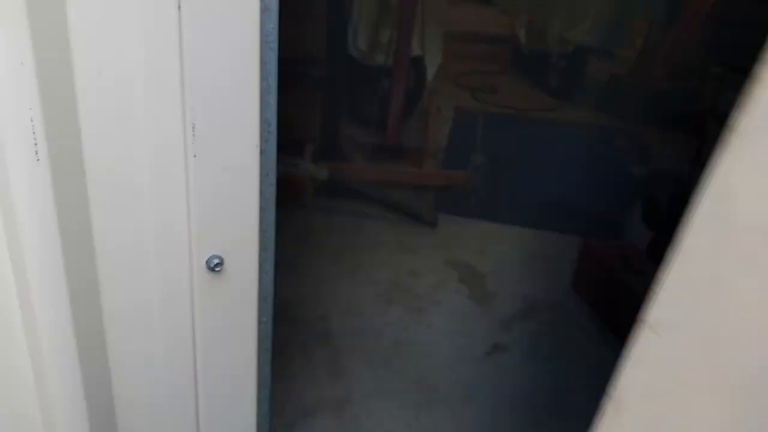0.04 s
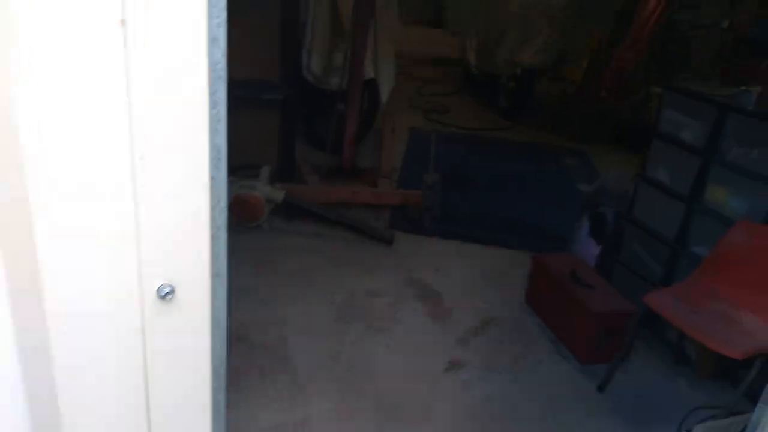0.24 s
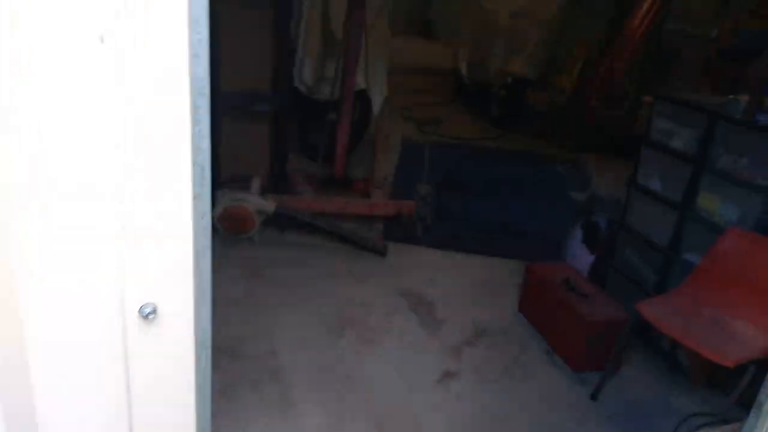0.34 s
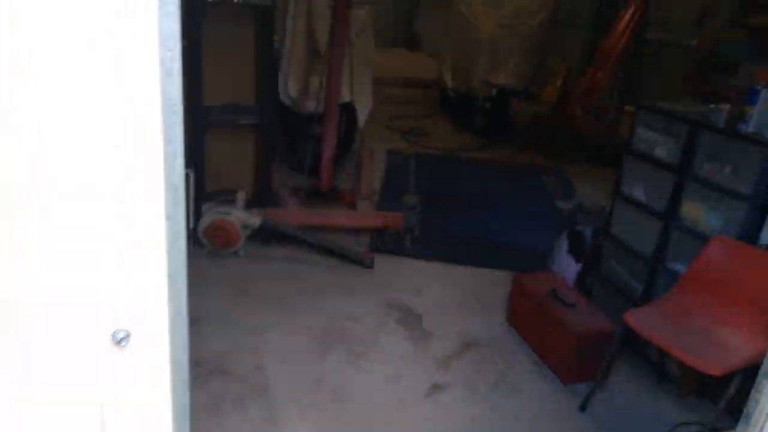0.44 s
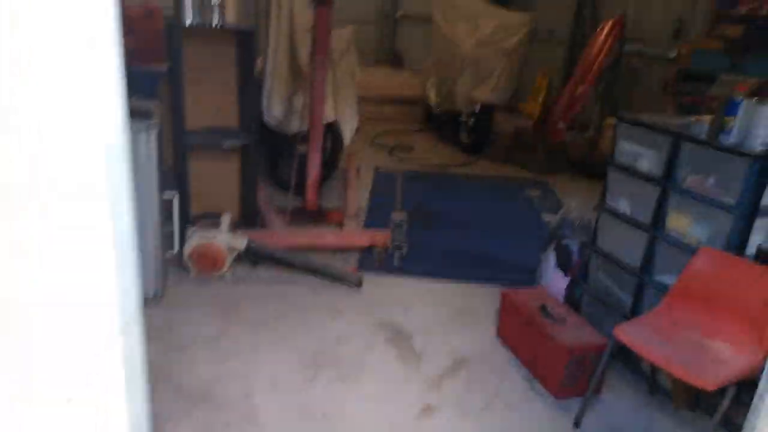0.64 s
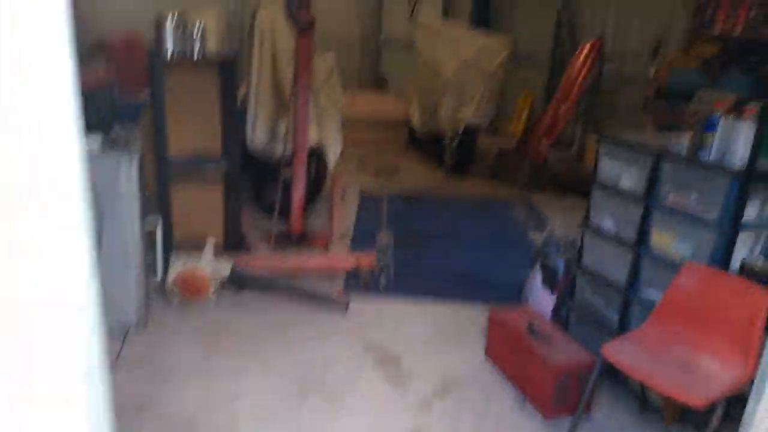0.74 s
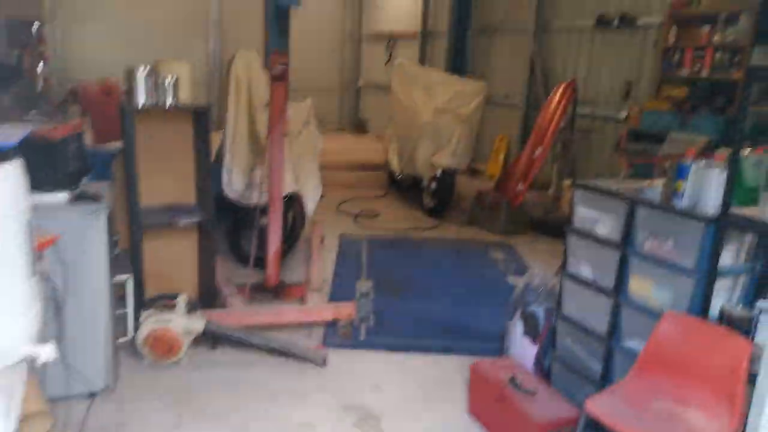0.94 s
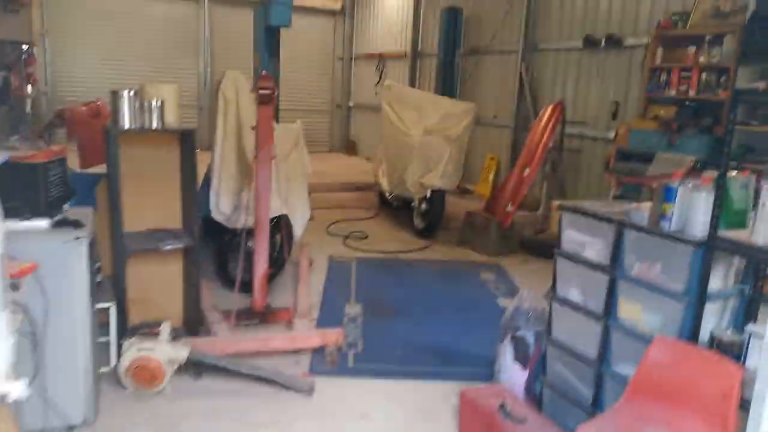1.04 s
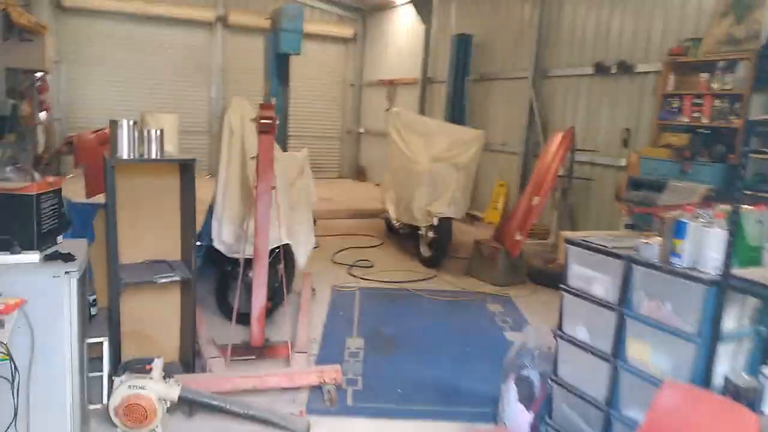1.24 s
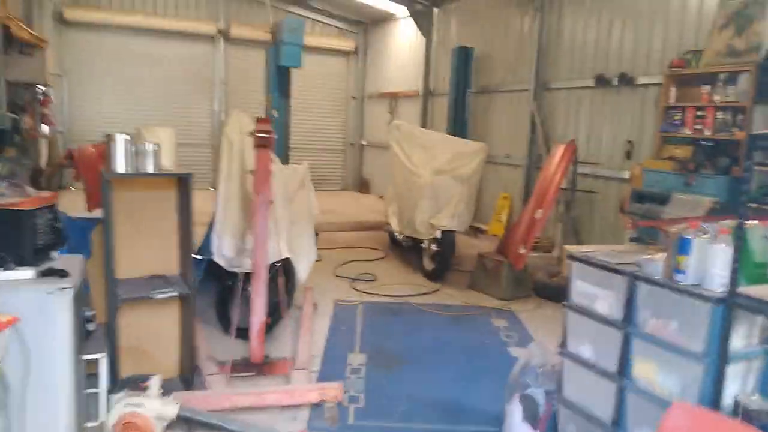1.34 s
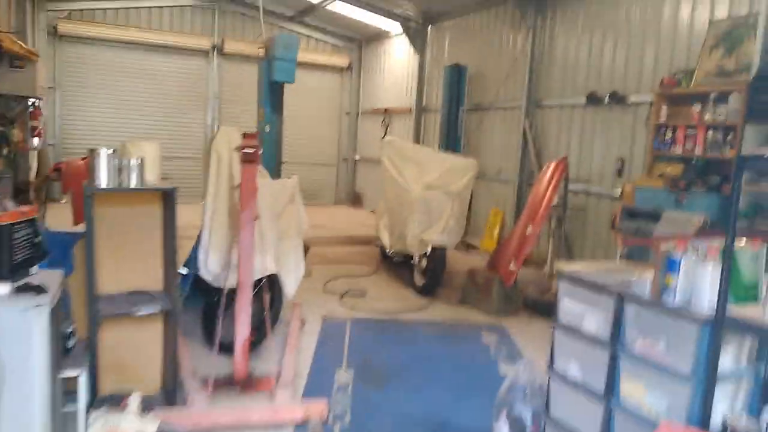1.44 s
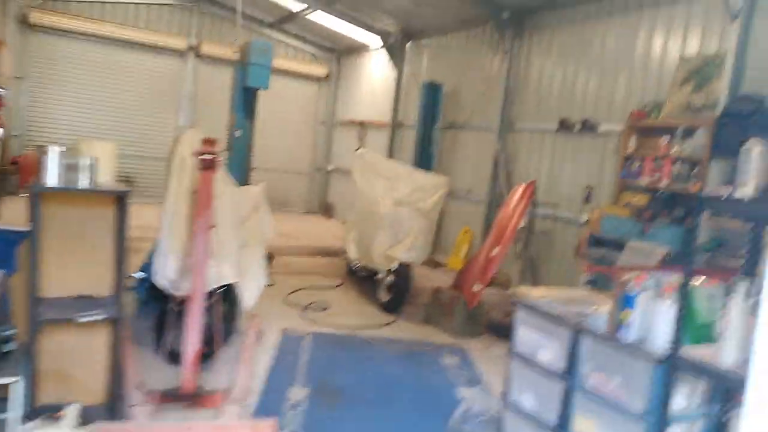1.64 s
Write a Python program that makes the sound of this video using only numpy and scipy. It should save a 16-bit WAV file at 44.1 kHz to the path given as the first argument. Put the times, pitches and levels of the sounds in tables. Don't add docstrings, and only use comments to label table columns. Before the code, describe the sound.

A steel-clad door scrapes harshly over gritty concrete, catching in jerks, then sliding and stopping abruptly

```python
import sys
import numpy as np
from scipy import signal
from scipy.io import wavfile
from scipy.ndimage import uniform_filter1d

SR = 44100
rng = np.random.default_rng(int(sys.argv[2]) if len(sys.argv) > 2 else 0)


def volts_from_decibels(level):
    exponent = np.asarray(level, float) / 20
    return 10 ** exponent


def unload_audio(sound):
    columns = np.transpose(np.atleast_2d(sound))
    steps = np.round(np.clip(columns, -1, 1) * 32767)
    wavfile.write(sys.argv[1], SR, steps.astype(np.int16))


N = 72765


def rms_one(x):
    return x / np.sqrt(np.mean(x ** 2) + 1e-20)


def in_time(rows):
    s, *columns = np.transpose(rows)
    return [np.interp(np.arange(N) / SR, s, c) for c in columns]


def at_hz(points, hz):
    table_hz, values = np.transpose(points)
    return np.interp(np.log(hz), np.log(table_hz), values)


def pan(db):
    return volts_from_decibels(np.array([db / 2, -db / 2]))


def step(s, over_s, before_db, after_db):
    passed = .5 + .5 * np.tanh((np.arange(N) / SR - s) / over_s)
    return volts_from_decibels(before_db + (after_db - before_db) * passed)


def burst(s, length, attack_s):
    t = np.maximum(np.arange(N) / SR - s, 0)
    return (1 - np.exp(-t / attack_s)) ** 2 * np.exp(-(t / length) ** 3)


def drift(rate):
    r = np.exp(-80 * np.pi * rate / SR)
    noise = rng.standard_normal(N // 40 + 2002)
    slow = signal.lfilter([1], [1, -2 * r, r * r], noise)[2000:]
    return np.interp(np.arange(N) / 40, np.arange(len(slow)), rms_one(slow - slow.mean()))


def resonate(x, hz, width_hz):
    r = np.exp(-np.pi * width_hz / SR)
    zeros = np.array([1, 0, -1]) * (1 - r * r) / 2
    return signal.lfilter(zeros, [1, -2 * r * np.cos(2 * np.pi * hz / SR), r * r], x)


GRAINS_PER_S, GRAIN_SPREAD_DB, CLUMP_DB = 9000, 2, 0.5


def grains():
    sizes = volts_from_decibels(GRAIN_SPREAD_DB * np.minimum(rng.exponential(1, (6, N)), 5))
    sizes = sizes * rng.choice([-1, 1], (6, N))
    struck = rng.random((6, N)) < GRAINS_PER_S / SR
    clumps = volts_from_decibels(CLUMP_DB * drift(37.0) + 0.41 * drift(135.0))
    return rms_one(sizes * struck * clumps + 1e-18)


# (f/Hz, left-right level/dB)
PORT_BALANCE = [(60, -7), (130, 2), (290, 3), (640, 1), (1410, 5.5), (3100, 5.5), (6820, 1), (15000, -1)]
# (f/Hz, likeness [0 to 1])
LIKENESS = [(60, 0.73), (300, 0.77), (700, 0.77), (1300, 0.54), (2500, 0.095), (9000, 0.069)]
PORT_LAG_S = .0004


def coloured(trains, spectrum, patchy_db):
    low_hz, high_hz = spectrum[0][0], min(spectrum[-1][0], .4 * SR)
    edges = np.geomspace(low_hz, high_hz, int(4 * np.log2(high_hz / low_hz)) + 2)
    out, trains = 0, trains.reshape(2, 3, N)
    for k, (low, high) in enumerate(zip(edges, edges[1:])):
        band = signal.butter(2, [low, high], "band", fs=SR, output="sos")
        both, left, right = signal.sosfilt(band, trains[k % 2])
        hz = np.sqrt(low * high)
        alike = at_hz(LIKENESS, hz)
        shared = np.array([np.roll(both, int(PORT_LAG_S * SR)), both])
        pair = np.sqrt(alike) * shared + np.sqrt(1 - alike) * np.array([left, right])
        level = volts_from_decibels(at_hz(spectrum, hz) + patchy_db * drift(13.8))
        out = out + level * pan(at_hz(PORT_BALANCE, hz))[:, None] * pair
    return rms_one(out)


# (t/s, grit level/dB, pressure on the sheet/dB, place left-right/dB)
DRAG = [(0, -34.5, -7, -1), (.055, -37.5, -6, 1), (.058, -30.5, -13.5, -1), (.1, -31.5, -9, 2),
        (.104, -24.5, -12, 1.5), (.152, -29.5, -7, 0.5), (.158, -26, -11, 1.5), (.245, -22.5, -9, 2.5),
        (.30, -19, -10, 2.5), (.42, -18.5, -10.5, 0.5), (.554, -16.5, -9.5, -2.5), (.6, -19, -10.5, 0),
        (.85, -17.5, -12, -2.5), (.9, -17, -10.5, -1.5), (1.12, -19, -10, -1), (1.4, -25, -11, -2.5),
        (1.44, -37, -5.5, 0), (1.53, -47.5, 3, -1)]


def scrape():
    level_db, pressure_db, place_db = in_time(DRAG)
    steady = volts_from_decibels(level_db) * pan(place_db)
    crunch, rings = catches()
    return grit(steady, crunch) + rings + sheet(steady, pressure_db, crunch)


# (t/s, peak level/dB, length/s, place left-right/dB, f/Hz)
CATCHES = [(0.055, -16, 0.012, 3, 7560), (0.067, -19, 0.014, 3, 8750), (.1012, -13, 0.0083, 16, 7700),
           (0.155, -13, 0.035, 6.5, 7400), (0.204, -11, 0.02, 9, 8600), (0.25, -9.5, 0.0079, 4, 8850),
           (.298, -5, 0.0094, 2, 9100), (.311, -5, 0.0037, 6, 8700), (0.316, -7.5, 0.011, 1, 9300),
           (.345, -13, 0.018, -6, 8900), (.415, -15, 0.0037, 0, 8900), (0.438, -9.5, 0.02, 6, 8100),
           (0.473, -7, 0.028, 0, 8800), (0.512, -6, .005, -5, 8800), (0.522, -7, 0.076, 2, 9000),
           (.581, -6, .005, 0, 8600), (0.647, -9.5, 0.018, 3, 8700), (0.698, -8, 0.0028, 4.5, 8700),
           (0.715, -9, 0.012, 5, 8300), (0.731, -10.5, 0.015, 2, 8800), (.759, -7, 0.006, -6, 9300),
           (0.784, -8.5, 0.025, -3, 8140), (0.802, -5.5, 0.044, 4.5, 6960), (0.846, -4, 0.011, -1, 8900),
           (0.862, -9, 0.021, 7, 8600), (0.93, -12, 0.009, -8, 9200), (0.947, -6.5, 0.011, -4, 9200),
           (0.993, -8, 0.0085, -3, 8600), (1.026, -7, 0.0072, -4, 9300), (1.043, -8.5, 0.016, -7, 9000),
           (1.112, -9.5, 0.028, -1, 9000), (1.148, -14, .005, -5, 8700), (1.186, -17, .005, -3, 9000),
           (1.195, -16.5, .022, -6, 9000), (1.34, -16, .008, -2, 8200), (1.397, -8.5, 0.0029, -5, 9000),
           (1.465, -25, 0.0085, -7, 8900)]
CATCH_DB, CATCH_ATTACK_S = -11.5, .0007
CATCH_RING_DB, CATCH_WIDTH_HZ = -12, 820


def catches():
    crunch, rings, noise = 0, 0, grains()[:2]
    for s, db, length, place, hz in CATCHES:
        side = pan(np.clip(place, -8, 8))[:, None]
        contact = volts_from_decibels(db) * burst(s, length, CATCH_ATTACK_S) * side
        crunch = crunch + (volts_from_decibels(CATCH_DB) * contact) ** 2
        rings = rings + contact * rms_one(resonate(noise, hz, CATCH_WIDTH_HZ))
    return crunch, volts_from_decibels(CATCH_RING_DB) * rings


# (f/Hz, level/dB per Hz)
GRIT = [(4500, -19), (5500, -13), (6500, -7.5), (8000, -1.5), (9200, -1.5), (11000, -8), (13000, -8),
        (17500, -19)]
LIFT_S = 1.345
DULLED_HZ, DULLED_DB = 10600, -7


def grit(steady, crunch):
    hiss = volts_from_decibels(0.5) * np.sqrt(steady ** 2 + crunch) * coloured(grains(), GRIT, patchy_db=.9)
    lost = hiss * (1 - step(LIFT_S, 0.027, 0, DULLED_DB))
    high_pass = signal.butter(1, DULLED_HZ, "high", fs=SR, output="sos")
    return hiss - signal.sosfilt(high_pass, lost)


# (f/Hz, level/dB per Hz)
SHEET = [(620, -11), (850, -6), (1100, -4.5), (1500, -2.5), (2000, -2.5), (2400, -7), (4300, -4.5),
         (5500, -16.5)]
CATCH_SHEET_DB = -11
LIFT_FALL_S, LIFT_DB = .008, -11


def sheet(steady, pressure_db, crunch):
    pressed = (volts_from_decibels(pressure_db + 5.0) * steady) ** 2
    drive = np.sqrt(pressed + volts_from_decibels(2 * CATCH_SHEET_DB) * crunch)
    drive = drive * step(LIFT_S, LIFT_FALL_S, 0, LIFT_DB)
    return drive * coloured(grains(), SHEET, patchy_db=1.1)


# (t/s of the crest, peak level/dB, place left-right/dB, f/Hz)
SHUDDERS = [(.325, -52, 1, 55), (.35, -44, -3, 110), (0.367, -38.5, -11, 59), (.39, -33, -13, 55),
            (.395, -43, 10, 124), (0.414, -33, -13, 53.3), (0.441, -36.5, 4, 145), (0.469, -41.5, 8, 169),
            (0.443, -32, -4, 64), (0.484, -31, 1, 103), (0.519, -36, -8, 53), (0.548, -34.5, 0, 120),
            (0.586, -36, -3, 60), (0.602, -30.5, 1, 114), (0.636, -38, 2, 177), (.656, -39, 4, 86),
            (.702, -45, 5, 80), (.728, -41, -6, 80.5), (.747, -40, -6, 98), (0.802, -42, -4, 107),
            (0.858, -34.5, 1, 123), (.94, -38, -5, 85.6), (.994, -40, -3, 129), (1.021, -45, -8, 149),
            (1.062, -32.5, 2, 126), (1.051, -43, 0, 188), (1.086, -41, -3, 170), (1.123, -35, -2, 123),
            (1.147, -33, -4, 129), (1.203, -30, -5, 94), (1.235, -38.5, -6, 110), (1.28, -42, -5, 118),
            (1.315, -45, -8, 59), (1.338, -47, 6, 80), (1.367, -50, -6, 55), (1.379, -46, -13, 217),
            (1.41, -37, 5.5, 124), (1.465, -42.5, -7, 202), (1.489, -48, -4, 60), (1.43, -46, 0.5, 215),
            (1.531, -55, -6, 110), (1.638, -52, -5, 80)]
SHUDDER_DB = 2.5
RISE_S, RISE_CYCLES = .0025, .28


def shudders():
    out, phases = np.zeros((2, N)), rng.uniform(0, 2 * np.pi, len(SHUDDERS))
    for (s, db, place, hz), phase in zip(SHUDDERS, phases):
        rise = RISE_S + RISE_CYCLES / hz
        t = np.maximum(np.arange(N) / SR - s + 2.7 * rise, 0) / rise
        swell = (t / 2) ** 2 * np.exp(2 - t)
        swing = np.sin(2 * np.pi * hz * rise * t + phase)
        out += volts_from_decibels(db + SHUDDER_DB) * swell * swing * pan(place)[:, None]
    return out


# (t/s, level/dB)
DRUMMING = [
    (.15, -79),
    (.23, -54),
    (.27, -45),
    (.56, -43),
    (.59, -38.5),
    (1.06, -36.5),
    (1.3, -40),
    (1.48, -57),
    (1.53, -69),
]
# (f/Hz, level/dB per Hz)
PANEL = [(170, -5.5), (230, -17), (300, -6.5), (400, -4.5), (500, -5), (780, -7.5)]


def drumming():
    level_db, = in_time(DRUMMING)
    return volts_from_decibels(level_db) * coloured(grains(), PANEL, patchy_db=3.0)


# (t/s, length/s, f/Hz,
# width/Hz, level/dB)
RUBS = [(0.243, 0.074, 300, 30, -48), (.31, 0.14, 302, 30, -49.5), (0.448, 0.22, 1750, 605, -33.5),
        (0.619, 0.064, 307, 30, -36), (0.697, 0.099, 309, 30, -42.5), (0.818, 0.056, 311, 30, -39),
        (0.878, .045, 311, 30, -46), (1.062, 0.041, 705, 120, -34), (1.184, 0.09, 2020, 170, -31),
        (1.365, 0.054, 640, 169, -45.5), (1.413, 0.048, 9100, 500, -47), (1.465, 0.05, 9150, 500, -47),
        (1.642, .02, 1410, 200, -48)]
RUB_ATTACK_S, RUB_PAN_DB = 0.0036, 7
EVEN_CYCLES = 2.5


def rubs():
    out = 0
    for (s, length, hz, width_hz, db), rub in zip(RUBS, rng.standard_normal((len(RUBS), N))):
        note = resonate(resonate(rub, hz, width_hz), hz, width_hz)
        power = uniform_filter1d(note ** 2, int(EVEN_CYCLES * SR / width_hz) + 1)
        note = note / np.sqrt(power + 0.18 * np.mean(note ** 2))
        out = out + volts_from_decibels(db) * burst(s, length, RUB_ATTACK_S) * note * pan(RUB_PAN_DB)[:, None]
    return out


# (t/s, level/dB, place left-right/dB)
DRAUGHT = [
    (0.2, -69, -6.0),
    (0.304, -50, -5),
    (0.41, -42, -10),
    (0.5, -35.5, -4),
    (0.8, -44, -10),
    (1.0, -52, -4),
    (1.12, -38, -4),
    (1.3, -47, -1),
    (1.65, -64, -17),
]
DRAUGHT_HZ, DRAUGHT_WIDTH_HZ, DRAUGHT_LIKENESS = 49.5, 14, .5


def draught():
    level_db, place_db = in_time(DRAUGHT)
    puffs = resonate(rng.standard_normal((3, N)), DRAUGHT_HZ, DRAUGHT_WIDTH_HZ)
    both, left, right = resonate(puffs, DRAUGHT_HZ, DRAUGHT_WIDTH_HZ)
    own = np.sqrt(1 - DRAUGHT_LIKENESS) * np.array([left, right])
    return volts_from_decibels(level_db - 4.5) * pan(place_db) * rms_one(np.sqrt(DRAUGHT_LIKENESS) * both + own)


# (f/Hz, level/dB per Hz)
FLOOR = [(500, 10), (1200, 2), (3000, -15), (5500, -10), (7500, 7), (9000, -1), (11000, -10), (17500, -14)]
FLOOR_DB = -58


def quiet_air():
    return volts_from_decibels(FLOOR_DB) * coloured(rng.standard_normal((6, N)), FLOOR, patchy_db=-1.0)


# (f/Hz, level/dB per Hz)
SHED = [(50, 12), (70, -10), (120, 5.5), (200, 0), (350, -5), (600, -11.5)]
SHED_DB = -55
OPENS_S, OPENING_S, SHUT_DB = 0.32, 0.055, -4


def shed_murmur():
    gap = step(OPENS_S, OPENING_S, SHUT_DB, 0)
    return volts_from_decibels(SHED_DB) * gap * coloured(rng.standard_normal((6, N)), SHED, patchy_db=-4.0)


def scene():
    return scrape() + shudders() + drumming() + rubs() + draught() + quiet_air() + shed_murmur()


def band_limit(x):
    return signal.sosfilt(signal.butter(12, 15950, fs=SR, output="sos"), x)


PORT_HZ, PORT_WIDTH_HZ = 9000, 1270
CUTOFF_HZ, CEILING = 15940, .86


def record(dry):
    x = signal.sosfilt(signal.butter(3, 42.0, "high", fs=SR, output="sos"), dry)
    x = volts_from_decibels(-2.0) * (x + resonate(x, PORT_HZ, PORT_WIDTH_HZ))
    x = x / (1 + (np.abs(x) / CEILING) ** 4) ** .25
    x = signal.sosfilt(signal.ellip(16, .5, 95, CUTOFF_HZ, fs=SR, output="sos"), x)
    return band_limit(x)


dry = scene()
out = record(dry)
unload_audio(out)
```